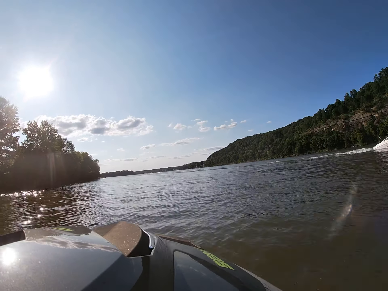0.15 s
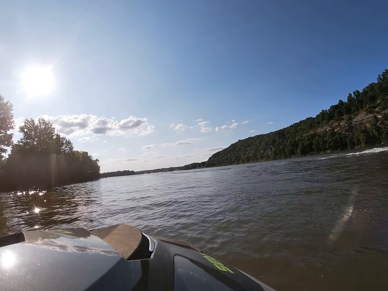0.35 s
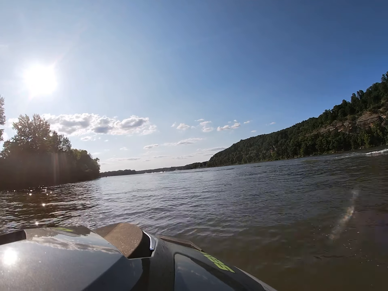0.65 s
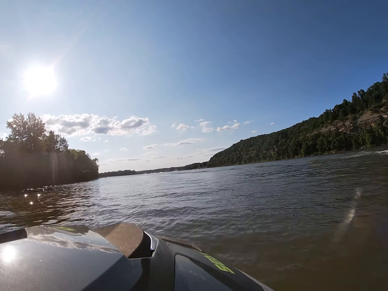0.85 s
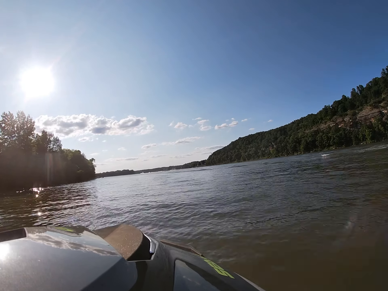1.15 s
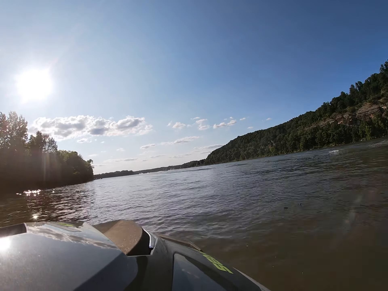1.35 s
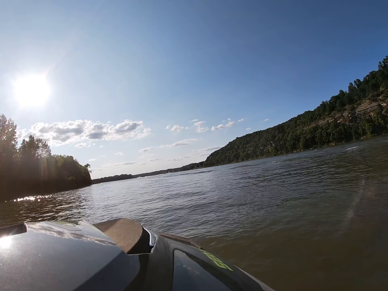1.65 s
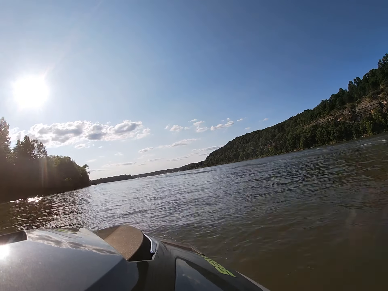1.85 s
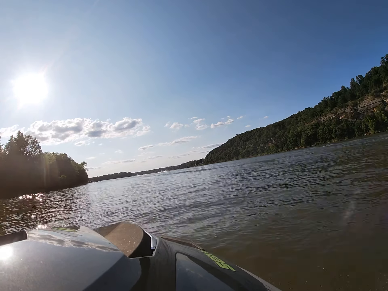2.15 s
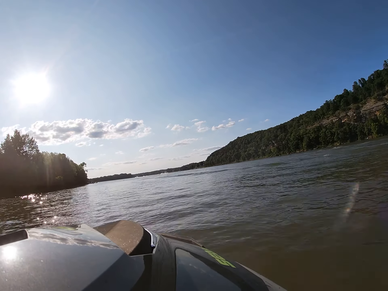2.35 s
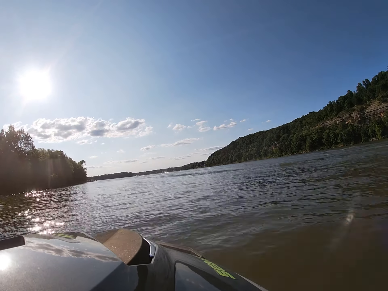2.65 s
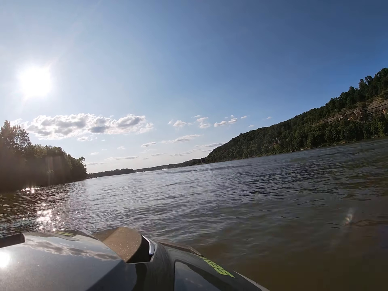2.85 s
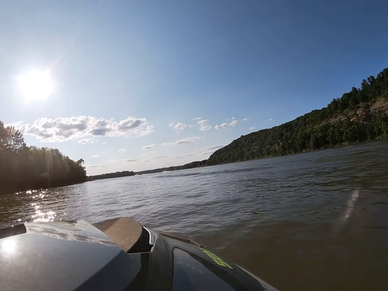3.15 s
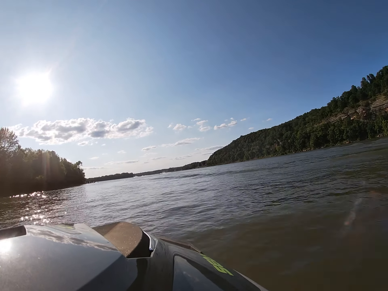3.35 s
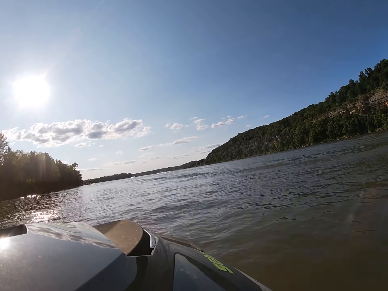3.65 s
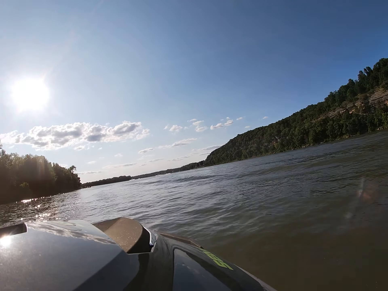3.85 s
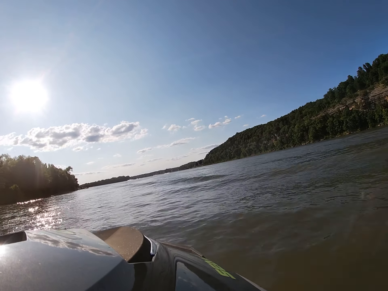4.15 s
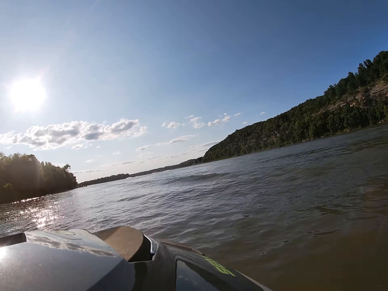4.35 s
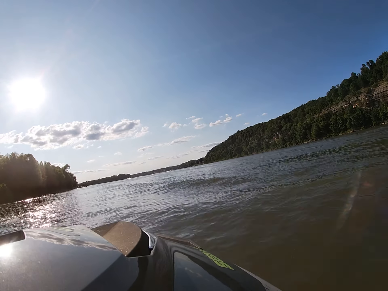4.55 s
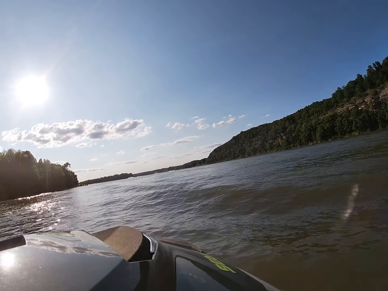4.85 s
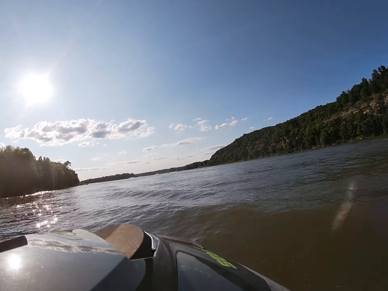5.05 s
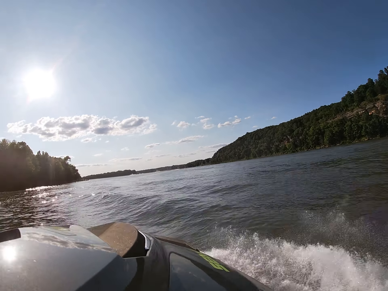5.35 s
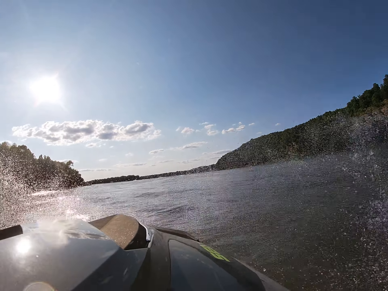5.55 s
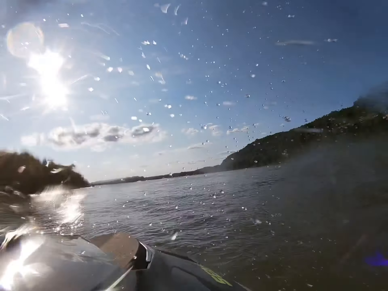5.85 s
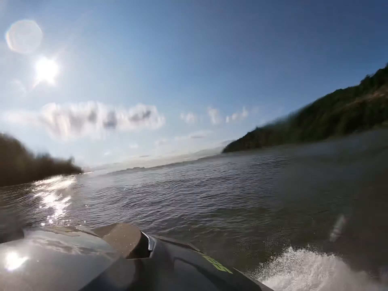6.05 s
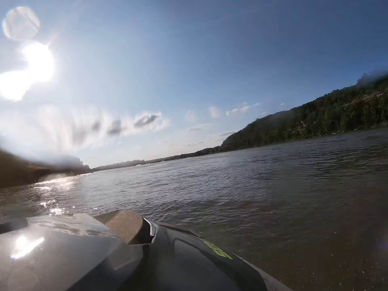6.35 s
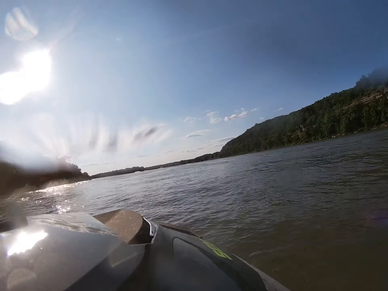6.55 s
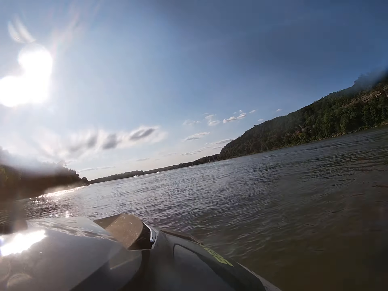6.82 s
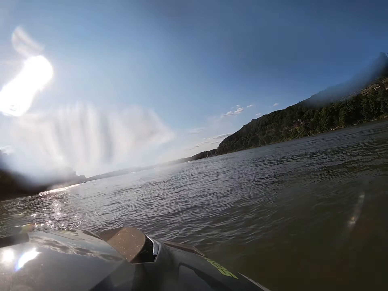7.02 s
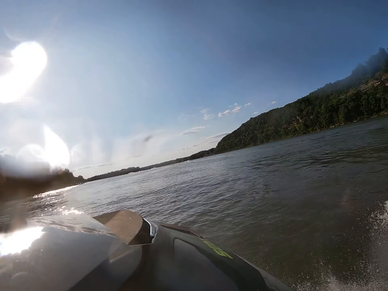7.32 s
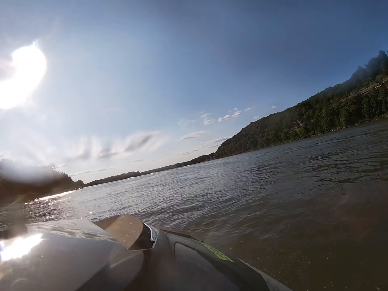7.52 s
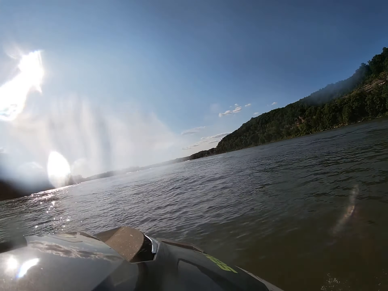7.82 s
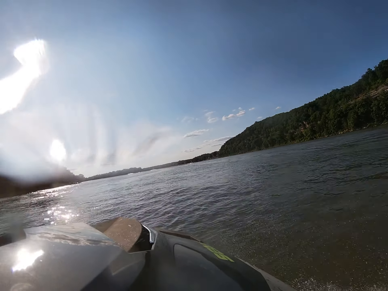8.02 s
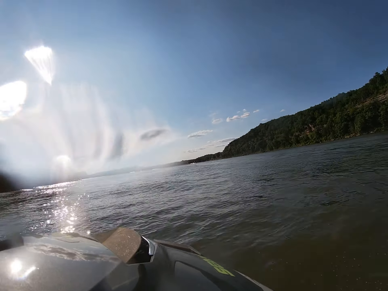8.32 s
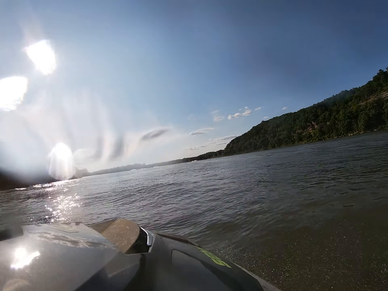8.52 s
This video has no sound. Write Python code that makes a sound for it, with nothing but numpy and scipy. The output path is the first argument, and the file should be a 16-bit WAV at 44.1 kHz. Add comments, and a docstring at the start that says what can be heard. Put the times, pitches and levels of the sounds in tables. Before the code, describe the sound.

Outdoors on open water, a hull-mounted microphone picks up a steady, fluttering engine drone under low wind buffeting and rushing water. Drops tap the housing and a loose part chirps faintly. Past midway the engine races upward and roughens as the craft hits a wake, with dense knocks, deep slaps and bright spray. The note collapses, rebounds, dips with another splash, then steadies among scattered drops.

```python
"""On a river, a three-cylinder jet craft cruises past waves and a wake, heard at its hull.
Shaft orders are summed as near-sines; the speed flares when the pump gulps air over the wake.
Wind and rushing water are coloured noise; drops, spits and swishes are brief bursts of filtered noise.
Gurgles, ticks and crackle are random decaying rings, and churned water excites the hull cavities.
Slams are windowed low sines; a loose part squeaks in rough pairs of tones."""
import sys
import numpy as np
from scipy import signal
from scipy.io import wavfile
from scipy.ndimage import uniform_filter1d

SR = 44100
rng = np.random.default_rng(int(sys.argv[2]) if len(sys.argv) > 2 else 0)


def linear_from_db(decibels):
    """Turn decibels (scalar or array-like) into linear amplitude factors; 0 gives 1."""
    return 10 ** (np.asarray(decibels, float) / 20)


def persist_wave(psi):
    """Save psi, clipped to +-1, as 16-bit WAV."""
    counts = np.round(np.clip(psi, -1, 1) * 32767).astype(np.int16)
    wavfile.write(sys.argv[1], SR, np.atleast_2d(counts).T)


N = 382788

# Shaft speed. Each row: time in seconds, speed in turns per second.
SHAFT_SPEED = [(0.03, 74.2), (0.39, 73.9), (0.7, 75.0), (1.16, 74.9), (1.47, 79.8), (2.0, 79.4),
               (2.32, 79.7), (3.45, 80.1), (3.64, 78.4), (4.07, 77.1), (4.56, 74.3), (4.8, 71.3),
               (4.97, 72.0), (5.11, 74.2), (5.28, 82.8), (5.34, 88.0), (5.41, 103.0), (5.47, 108.5),
               (5.53, 111.5), (5.59, 113.0), (5.63, 115.5), (5.76, 118.0), (5.87, 129.5), (5.96, 115.0),
               (6.07, 81.3), (6.24, 70.0), (6.39, 79.8), (6.53, 93.2), (6.66, 95.0), (6.77, 94.3),
               (6.92, 71.4), (7.05, 60.6), (7.26, 72.7), (7.36, 80.0), (7.5, 86.3), (7.88, 83.6),
               (8.1, 74.8), (8.34, 77.0), (8.68, 77.5)]
# Engine load; the last two columns sink when the pump gulps air.
# Each row: time in seconds, engine effort in dB, third order in dB, fourth order in dB.
ENGINE_LOAD = [(0.03, 1, 3, 7), (0.4, -1, 0.5, 3), (0.7, -1.5, 6, 7), (1.15, -3, 3.5, -2),
               (1.28, -5, 8.5, 3), (1.38, -2.5, 7, 6.5), (1.6, 1, 5.5, 7.5), (1.85, 0, 6.5, 5.5),
               (2.02, -5, 8.5, -1), (2.12, 4, 5, 6), (2.3, -7, 3, 10), (2.47, 3, 6.5, 6.5),
               (2.55, 5.5, 2, 1.5), (2.7, 5, 5.5, 0.5), (3.0, 4.5, 4.5, 5.5), (3.3, -4, 3, 8),
               (3.45, 4, 7, 4), (3.6, 4.5, 6, 6), (3.9, 1.5, 1, 5.5), (4.1, 2.5, 2, 3), (4.3, 4.5, 3.5, 6),
               (4.5, -4, 1.5, 4.5), (4.8, 2, 1.5, 7.5), (5.05, -5, 4.5, -2.5), (5.3, -1.5, 1, 2),
               (5.42, 1, -9, -15), (5.52, 2, -6, -2), (5.62, 6.5, -0.5, -13), (5.73, 10.5, -8, -6),
               (5.8, 0, -8, -10), (5.9, -5, -9, -14), (6.07, 3.5, 4, -14), (6.22, 6, -32, -29),
               (6.33, 4, -11, -9.5), (6.42, 4.5, -1.5, 3.5), (6.55, 0.5, -10, -19), (6.76, 2, 3.5, 0.5),
               (6.87, 4, 9.5, 6), (6.97, 4.5, -14, -19), (7.05, 7.5, -1.5, -11), (7.2, 6.5, -18.5, -18),
               (7.32, 12.5, 4.5, 5), (7.5, 2, -9, 6), (7.9, 5.5, 7.5, 5), (8.1, 5, -1, 8.5),
               (8.22, 2.5, 3, 5), (8.32, 5.5, 4, -15), (8.45, -11, 0.5, -10), (8.53, -2, 3.5, 6.5),
               (8.68, 0, 1, 5.5)]
# Second order. Each row: time in seconds, level change in dB.
SECOND_ORDER = [(0.03, 3), (1.2, 4), (1.6, 6), (2.7, -1), (4.0, -5.5), (5.1, 2), (5.35, 10.5), (5.45, 4.5),
                (5.52, 12), (5.6, -5), (5.78, 4), (5.9, -3), (6.2, -13), (6.45, 5), (6.7, -15), (6.95, 6),
                (7.2, -1), (7.5, 11.5), (8.0, -7), (8.68, 2.5)]
# Orders around the fifth; air in the pump breaks the lines up, shaking the phase of every order.
# Each row: time in seconds, level change in dB, rms of the fast phase shake in radians.
FIFTH_AND_ROUGHNESS = [(0.03, -2, .03), (1.2, -2, 0.024), (2.0, 4.5, 0.029), (2.7, 4, 0.034),
                       (3.3, 5.5, .05), (3.9, 7.5, 0.042), (4.5, 0.5, 0.13), (5.25, -2, 0.11),
                       (5.36, -6, .2), (5.43, 7.5, 0.17), (5.5, 8, .12), (5.6, 9, 0.13), (5.68, -7, .4),
                       (6.05, -17, 1), (6.3, -3, 0.43), (6.5, -12, 0.13), (6.9, -2, 0.088), (7.2, -6, 0.26),
                       (7.45, 3.5, 0.07), (8.0, 7, 0.054), (8.68, -3, 0.08)]
# Strong shaft orders, before load and hull. Each row: multiple of shaft speed, base rms in dB,
# rise in dB per 10 turns per second above 80.
STRONG_ORDERS = [(1, -29, 3), (1.5, -27, 0.5), (2, -33, 1), (3, -24, -1), (4, -24.5, 0.5), (5, -36, 2.5)]
# Weak orders from uneven firing. Each row: multiple of shaft speed, base rms in dB.
WEAK_ORDERS = [(2.5, -37), (3.5, -33), (4.5, -37), (5.5, -44), (6, -45), (7, -49.5), (7.5, -52), (8, -47.5),
               (9, -54)]
# Hull response to the strong orders. Each row: frequency in Hz, gain in dB.
HULL_RESPONSE = [(60, 3.5), (80, -3), (100, 0), (118, -3), (140, 5), (150, 11), (162, -3.5), (190, 6.5),
                 (222, 7), (240, 3), (258, -0.5), (283, 4), (298, -3), (318, 2), (345, 1.5), (372, -9),
                 (400, -0.5), (440, -2), (560, 0.5), (650, -23)]
# Panel resonances lifting the weak orders. Each row: centre in Hz, width in Hz, lift in dB.
PANEL_RESONANCES = [(578, 50, 10), (672, 30, 9), (420, 60, 2)]
# Slams of the hull on waves. Each row: start in seconds, peak in dB, pitch in Hz, length in seconds.
HULL_SLAMS = [(5.863, -12, 67, 0.049), (5.909, -7, 55.8, 0.08), (5.995, -14.5, 66.4, 0.11),
              (6.071, -16, 45.2, 0.067), (7.141, -21.5, 56.6, 0.18), (8.359, -16, 44.7, 0.058)]
# Churned water drumming in the hull over the wake. Each row: time in seconds, level in dB.
CHURN_LEVEL = [(5.27, -57.5), (5.33, -36), (5.42, -31), (5.5, -40), (5.6, -32), (5.68, -31.5), (5.78, -31),
               (5.9, -26), (6.02, -29.5), (6.09, -59)]
# Hull cavities rung by the churn. Each row: centre in Hz, width in Hz, relative level in dB.
HULL_CAVITIES = [(350, 90, -5), (552, 55, 1), (720, 110, -4), (1050, 130, -5), (1350, 200, -10)]
# Drops and slaps on the housing. Each row: start in seconds, tick peak in dB,
# bright edge relative to the tick in dB, body relative to the tick in dB.
HOUSING_DROPS = [(0.531, -33, -19, 11), (1.084, -34, -14, 14), (1.702, -35, -12, 13), (2.065, -40, -19, 11),
                 (2.154, -44, -16, 6), (2.198, -22, -20.5, 1), (2.392, -38, -12, 5), (2.603, -40, -20, 7),
                 (2.9294, -24, -18, 7), (3.458, -26.5, -15, 10), (3.765, -33, -18, 7),
                 (3.874, -31.5, -18, 18), (4.404, -21.5, -36, 8), (4.816, -33, -16, 13),
                 (5.3324, -24, -16, 7), (5.4527, -27, -18, 12), (5.4776, -30, -16, 6),
                 (5.5454, -36, -18, 15), (5.65, -31, -22, 17), (5.6744, -25, -20, 11), (5.72, -41, -17, 16),
                 (5.739, -25.5, -25, -2), (5.763, -24, -9, 17), (5.7896, -35, -22, -1),
                 (5.8105, -16.5, -11, 12), (5.8343, -33, 0, 15), (5.8438, -33, -3, 26),
                 (5.8511, -15.5, -14, 8), (5.876, -13, -23, 3), (5.894, -23, -22, 1), (5.915, -24, -5, 2),
                 (5.924, -17, -14, 4), (5.957, -14, -12, 11), (5.9964, -34, -18, 4),
                 (6.0029, -20, -20, 12.5), (6.016, -23, -7, 10), (6.024, -24.5, -4, 19),
                 (6.045, -18, -31, -6), (6.0827, -17, -31, 7.5), (6.167, -32.5, -20, 15),
                 (6.255, -40, -14, 11), (7.119, -31, -30, 7), (7.1613, -33, -14, 10),
                 (7.1755, -36, -15, 12), (7.192, -35, -10, 4), (7.2215, -16, -25, -3),
                 (7.225, -22.5, -15, 13), (7.265, -38, -11.5, 8), (7.316, -23, -22, 4),
                 (7.502, -34.5, -17, 17), (7.8607, -26, -21, 11), (7.904, -27, -19, 12),
                 (8.0674, -23, -16, -3.5), (8.08, -32, -27, 15), (8.092, -32, -25, 8),
                 (8.1265, -21, -29, 11), (8.2365, -30, -27, 20.5), (8.2558, -19, -23, 0),
                 (8.2958, -35, -28, 10), (8.305, -29, -22, 17), (8.3388, -21, -32, -3),
                 (8.3473, -26, -27, 8), (8.3845, -22, -22, 2), (8.401, -29, -22, 18),
                 (8.409, -17.5, -26, 5), (8.4458, -25.5, -25, 9), (8.4782, -28, -19, 10),
                 (8.557, -22, -24, 6), (8.57, -28, -16, 6.5)]
# Fine spray spitting on the microphone port. Each row: start in seconds, peak in dB, pitch in Hz.
PORT_SPITS = [(5.642, -55, 9600), (5.66, -46, 5000), (5.664, -45, 9000), (5.687, -49, 9500),
              (5.696, -51, 9000), (5.716, -56, 8500), (5.7374, -39.5, 9300), (5.742, -38, 5600),
              (5.749, -55, 8800), (5.763, -39, 5200), (5.784, -49, 7000), (5.789, -40, 5000),
              (5.815, -37, 5230), (5.827, -41, 8500), (5.8338, -38, 5600), (5.8447, -34, 8300),
              (5.851, -40, 5600), (5.864, -44, 4470), (5.872, -46, 6000), (5.8974, -32, 4500),
              (5.915, -34.5, 8600), (5.925, -43.5, 6500), (5.936, -49, 8500), (5.944, -53, 7500),
              (5.958, -28.5, 4500), (5.969, -40, 4300), (5.9945, -41, 4700), (6.014, -51, 6500),
              (6.0245, -35, 5000), (6.0238, -42, 8540)]
# Sheets of water off the bow. Each row: start in seconds, rms before the envelope in dB,
# decay length in seconds.
BOW_SWISHES = [(2.698, -46, 0.028), (2.768, -50, 0.055), (2.998, -44.5, 0.034), (3.561, -50, 0.039),
               (3.685, -46.5, 0.043), (3.756, -42.5, 0.032), (3.87, -54, 0.0099), (4.285, -41, 0.041),
               (4.355, -43.5, 0.019), (4.433, -42.5, 0.058), (4.473, -44, 0.049), (4.529, -47, 0.027),
               (5.345, -46, 0.045), (5.383, -40, 0.076), (5.554, -43, 0.041), (5.799, -50, 0.05),
               (5.874, -47, .06), (7.157, -45.5, 0.053), (7.206, -46, 0.081), (8.38, -57, 0.035),
               (8.432, -58, 0.049)]
# Rush under the hull, before surges. Each row: time in seconds, level in dB.
RUSH_LEVEL = [(0.03, -31.5), (0.3, -28.5), (1.25, -29), (1.75, -31.5), (2.1, -29.5), (2.24, -22.5),
              (2.35, -24.5), (2.9, -25.5), (3.3, -28.5), (3.75, -24), (4.1, -25), (4.55, -24.5), (4.6, -23),
              (4.63, -20), (4.665, -20.5), (4.685, -30.5), (4.8, -28.5), (5.25, -28), (5.33, -23.5),
              (5.41, -21), (5.5, -20.5), (5.6, -20.5), (5.74, -20), (5.85, -23.5), (5.95, -15.5),
              (5.985, -25.5), (6.03, -15.5), (6.07, -30.5), (6.14, -38), (6.5, -29), (6.82, -26),
              (7.11, -30), (7.17, -20.5), (7.205, -22.5), (7.235, -21.5), (7.28, -24.5), (7.4, -28),
              (7.85, -25.5), (8.02, -28.5), (8.08, -20), (8.2, -28), (8.42, -23.5), (8.65, -27)]
# Hiss of broken water, before surges. Each row: time in seconds, level in dB.
HISS_LEVEL = [(0.03, -43.5), (0.22, -44.5), (1.04, -44.5), (1.09, -43), (1.69, -46.5), (2.16, -42),
              (3.1, -42), (3.3, -44.5), (3.75, -42), (4.13, -41), (4.66, -40), (4.73, -43.5), (4.9, -42),
              (5.26, -44), (5.41, -41), (5.53, -41.5), (5.57, -39), (5.96, -37.5), (5.98, -46), (6.01, -32),
              (6.03, -40.5), (6.13, -48.5), (7.18, -43), (7.23, -41), (7.26, -42), (7.69, -44.5),
              (7.81, -41), (8.36, -44.5), (8.41, -39), (8.43, -42), (8.46, -35), (8.53, -43.5), (8.58, -38),
              (8.65, -40.5)]
# Fine spray, before surges. Each row: time in seconds, level in dB.
SPRAY_LEVEL = [(0.03, -64), (0.45, -63.5), (0.85, -66), (1.2, -63), (1.66, -67.5), (2.15, -63),
               (2.7, -71.5), (3.2, -71.5), (3.6, -66), (3.9, -70), (4.9, -68.5), (5.2, -72), (5.38, -62),
               (5.6, -68), (5.75, -57), (5.86, -60.5), (6.15, -76), (6.5, -77), (6.82, -67.5), (7.2, -63.5),
               (7.4, -70.5), (7.85, -64), (8.25, -71), (8.65, -73)]
# Spectrum of the rush. Each row: frequency in Hz, relative density in dB per Hz.
RUSH_COLOUR = [(100, -17), (200, 10), (350, 0.5), (550, 0), (750, -7.5), (1100, -11), (1600, -18.5),
               (2200, -40.5), (4000, -49)]
# Spectrum of the splash. Each row: frequency in Hz, relative density in dB per Hz.
SPLASH_COLOUR = [(700, -14), (1400, 5.5), (2200, -0.5), (3200, -3.5), (4200, -11), (5600, -14.5),
                 (6600, -37), (8000, -39)]
# Spectrum of the spray. Each row: frequency in Hz, relative density in dB per Hz.
SPRAY_COLOUR = [(5000, -17.5), (6300, 0.5), (7500, -3), (8600, -1), (9800, 1), (10600, -4.5),
                (11500, -13.5), (12500, -12), (14300, -37.5), (15000, -57)]
# Chirps of a loose part. Each row: start in seconds, upper tone level in dB, mean pitch in Hz,
# lower partner relative to the upper tone in dB.
LOOSE_PART_SQUEAKS = [(0.3052, -50, 3020, 15), (0.372, -47, 3000, -3), (0.574, -41, 2940, -2),
                      (0.6, -46.5, 2900, 10.5), (0.946, -46, 2820, 5), (1.037, -43, 2770, 1),
                      (1.0848, -44, 2830, 6), (1.139, -41, 2980, 2.5), (1.466, -45, 3015, 5),
                      (1.993, -46, 3240, 4), (2.446, -42, 3080, -1), (2.546, -46, 2860, -6),
                      (3.18, -40.5, 3050, -5.5), (3.482, -39.5, 3200, 1), (4.1038, -43, 3520, -17),
                      (4.565, -46, 3370, -6.5), (4.601, -47, 3200, 7), (4.634, -52, 3200, 1),
                      (4.655, -48, 3620, -8), (4.6903, -40, 3280, -2.5), (4.708, -50, 3250, -7),
                      (4.742, -44.5, 3180, -8), (4.772, -47, 3300, -11), (4.813, -39, 3500, -2),
                      (4.836, -49, 3480, -6), (4.883, -47, 3270, 8), (4.902, -54, 3250, 19),
                      (4.972, -51, 3170, 10), (5.6208, -35.5, 3620, -9)]
# Wind buffeting, before gusts. Each row: time in seconds, level in dB.
WIND_LEVEL = [(0.03, -17.5), (1.0, -22), (1.5, -17.5), (2.8, -18), (3.9, -17), (4.8, -20.5), (5.3, -18.5),
              (5.37, -17), (5.5, -18), (5.7, -13), (6.0, -20.5), (6.45, -21), (6.9, -18.5), (7.15, -16),
              (7.24, -13.5), (7.4, -19), (8.0, -18), (8.65, -17.5)]
# Spectrum of the wind. Each row: frequency in Hz, relative density in dB per Hz.
WIND_COLOUR = [(15, -11.5), (30, 7), (60, 3.5), (120, -1), (200, 2.5), (320, -1), (450, -16), (800, -46.5)]

FLUTTER_DB = 1.8  # rms wavering of the orders that follow engine effort
FAINT_FADE_DB = 5.5  # lost by the weak orders per 10 turns per second above 90
KNOCKS_PER_S, KNOCK_SPREAD_DB, KNOCK_TOP_HZ = 400, 4, 1800
DROP_T60_S = 0.02  # 60 dB decay time of the tick
SPIT_DECAY_S, SPIT_SPAN = 0.0009, 1.35  # span: pitch ratio covered on either side
SURGE_DB = 0.6
SURGE_GROWTH = 0.076  # surge dB per dB of rush above -30.5: heavy water comes in lumps
SQUEAK_S = 0.025
GUST_DB = 1.5


def evened(x):
    """Normalization: the mean power is brought to unity."""
    return x / np.sqrt(np.mean(x ** 2) + 1e-20)


def column(rows, index):
    """Linear interpolation: one table column is evaluated at every sample."""
    table = np.array(rows)
    return np.interp(np.arange(N) / SR, table[:, 0], table[:, index])


def wander(hz):
    """Random modulation: interpolated noise of unit rms drifts at rates up to about hz."""
    steps = rng.standard_normal(4000)
    return evened(np.interp(np.arange(N) / SR * 2 * hz, np.arange(len(steps)), steps))


def add(mix, s, sound):
    """Superposition: a sound is summed into the mix from time s in seconds."""
    part = mix[round(s * SR):][:len(sound)]
    part += sound[:len(part)]


def bandpass(order, low_hz, high_hz):
    """Band limitation: a Butterworth filter passes one range of frequencies."""
    return signal.butter(order, (low_hz, high_hz), "bandpass", fs=SR, output="sos")


def drop_sizes(per_s, spread_db):
    """Random arrivals: sparse impulses carry capped, exponentially distributed dB levels."""
    size = linear_from_db(spread_db * np.minimum(rng.exponential(1, N), 4))
    return size * (rng.random(N) < per_s / SR)


def turbulence(colour, size, patchy_db, flicker_db):
    """Turbulent noise: a shaped spectrum drifts in patches and flickers at all pitches together."""
    hop = size // 4
    frames = N // hop + 5
    hz = np.fft.rfftfreq(size, 1 / SR)
    real, imaginary, patches = rng.standard_normal((frames, len(hz), 3)).T
    patches = uniform_filter1d(patches, size=8, axis=0)
    patches = evened(uniform_filter1d(patches, size=8, axis=1))
    flicker = evened(uniform_filter1d(rng.standard_normal(frames), size=4))
    colour_hz, colour_db = np.transpose(colour)
    shape_db = np.interp(np.log(hz + 1), np.log(colour_hz), colour_db, left=-90, right=-90)
    level_db = shape_db[:, None] + patchy_db * patches + flicker_db * flicker
    spectrum = (real + 1j * imaginary) * linear_from_db(level_db)
    return evened(signal.istft(spectrum, nperseg=size, noverlap=size - hop)[1][:N])


def patter(low_hz, high_hz, cycles, per_s, spread_db):
    """Damped oscillation: random drops of many sizes each ring for a few cycles at one pitch."""
    size = drop_sizes(per_s, spread_db)
    pitches = np.geomspace(low_hz, high_hz, num=12)
    kind = rng.integers(0, len(pitches), size=N)
    t, out = np.arange(1200) / SR, np.zeros(N)
    for k, hz in enumerate(pitches):
        ring = np.sin(2 * np.pi * hz * t) * (hz * t) ** 2 * np.exp(-5 * hz * t / cycles)
        out += signal.oaconvolve(size * (kind == k), ring)[:N]
    return evened(out)


def strong_order_levels(shaft_hz, fifth_db):
    """Forced response: load and speed set each strong order, and the hull transmits it."""
    effort_db, third_db, fourth_db = (column(ENGINE_LOAD, index=i) for i in (1, 2, 3))
    own_drive = {2: column(SECOND_ORDER, index=1), 3: third_db, 4: fourth_db, 5: fifth_db}
    hull_hz, hull_db = np.transpose(HULL_RESPONSE)
    over = np.minimum(shaft_hz - 80, 15) / 10
    levels = []
    for k, db, rise_db in STRONG_ORDERS:
        drive_db = own_drive[k] if k in own_drive else effort_db + FLUTTER_DB * wander(hz=5)
        carried_db = np.interp(k * shaft_hz, hull_hz, hull_db)
        levels.append((k, db + drive_db + rise_db * over + carried_db))
    return levels


def weak_order_levels(shaft_hz, fifth_db):
    """Resonance: weak orders come and go, and swell as they pass through the panel modes."""
    third_db = column(ENGINE_LOAD, index=2)
    fade_db = FAINT_FADE_DB * np.maximum(shaft_hz - 90, 0) / 10
    levels = []
    for k, db in WEAK_ORDERS:
        lift_db = sum(top_db / (1 + (2 * (k * shaft_hz - hz) / width) ** 2)
                      for hz, width, top_db in PANEL_RESONANCES)
        drive_db = fifth_db if 4 < k < 6 else 0.26 * third_db
        levels.append((k, db + drive_db - fade_db + lift_db + 2.5 * wander(hz=6)))
    return levels


def engine():
    """Order synthesis: near-sines flutter as the hull panels load and unload on the water."""
    shaft_hz = column(SHAFT_SPEED, index=1)
    angle = 2 * np.pi * np.cumsum(shaft_hz * (1 + 0.002 * wander(hz=10))) / SR
    fifth_db, rough = (column(FIFTH_AND_ROUGHNESS, index=i) for i in (1, 2))
    levels = strong_order_levels(shaft_hz, fifth_db) + weak_order_levels(shaft_hz, fifth_db)
    out = np.zeros(N)
    for k, db in levels:
        # each order wobbles separately in phase and level
        slip = 2 * np.pi * rng.random() + 0.25 * wander(hz=10) + rough * wander(hz=35)
        out += linear_from_db(db + 1.4 * wander(hz=14)) * np.sqrt(2) * np.cos(k * angle + slip)
    return out


def slams():
    """Impact: the hull meets a wave and gives a few cycles of deep, rounded thud."""
    out = np.zeros(N)
    for s, db, hz, length in HULL_SLAMS:
        t = np.arange(int(length * SR)) / SR
        add(out, s, linear_from_db(db) * np.hanning(len(t)) * np.sin(2 * np.pi * hz * t))
    return out


def churn():
    """Cavity resonance: dense, uneven, soft-edged knocks of water ring the hull cavities."""
    knocks = drop_sizes(KNOCKS_PER_S, KNOCK_SPREAD_DB) * rng.choice([-1., 1.], N)
    knocks = signal.sosfilt(signal.butter(4, KNOCK_TOP_HZ, fs=SR, output="sos"), knocks)
    rung = np.zeros(N)
    for hz, width, db in HULL_CAVITIES:
        b, a = signal.iirpeak(hz, hz / width, fs=SR)
        rung += linear_from_db(db) * evened(signal.lfilter(b, a, knocks))
    return linear_from_db(column(CHURN_LEVEL, index=1)) * evened(rung)


def drops():
    """Impulse: a drop punches the microphone port inward, leaving a tick and shorter bright edge."""
    t, out = np.arange(3000) / SR, np.zeros(N)
    body, tick, edge = bandpass(3, 350, 1200), bandpass(3, 900, 2200), bandpass(5, 2600, 6000)
    punch = -np.pad(np.blackman(44), (0, len(t) - 44))  # a 1 ms inward push
    noises = rng.standard_normal((len(HOUSING_DROPS), 3, len(t)))
    for (s, db, treble_db, body_db), noise in zip(HOUSING_DROPS, noises):
        # filter, share of the punch, relative level in dB, decay relative to the tick
        parts = [(body, 3, body_db, 1.4), (tick, 1.5, 0, 1), (edge, 0, treble_db, 0.7)]
        for (band, push, rel_db, lasts), puff in zip(parts, noise):
            decay = linear_from_db(-60 * t / (lasts * DROP_T60_S))
            burst = signal.sosfilt(band, push * punch + puff * decay)
            add(out, s, linear_from_db(db + rel_db) * burst / abs(burst).max())
    return out


def spits():
    """Transient excitation: a decaying snap of noise fills a wide band around each spit's pitch."""
    t, out = np.arange(300) / SR, np.zeros(N)
    for (s, db, hz), noise in zip(PORT_SPITS, rng.standard_normal((len(PORT_SPITS), len(t)))):
        band = bandpass(3, hz / SPIT_SPAN, min(hz * SPIT_SPAN, 10600))
        tick = signal.sosfilt(band, noise * np.exp(-t / SPIT_DECAY_S))
        add(out, s, linear_from_db(db) * tick / abs(tick).max())
    return out


def swishes():
    """Noise burst: a sheet of water off the bow starts fast, bright, and thins out."""
    band, out = bandpass(7, 2000, 5800), np.zeros(N)
    for (s, db, length), noise in zip(BOW_SWISHES, rng.standard_normal((len(BOW_SWISHES), 6000))):
        u = np.arange(len(noise)) / SR / length
        tilted = signal.lfilter([1], [1, -0.8], noise)  # less treble
        bright = evened(signal.sosfilt(band, tilted))
        add(out, s, linear_from_db(db) * bright * np.minimum(8 * u, 1) * np.exp(-u ** 2))
    return out


def flow():
    """Common modulation: the dB levels of rush, hiss and spray surge together."""
    rush_db = column(RUSH_LEVEL, index=1)
    lumps_db = SURGE_GROWTH * np.maximum(rush_db + 30.5, 0) * wander(hz=30.5)
    surge_db = SURGE_DB * wander(hz=9) + lumps_db
    return [db + surge_db for db in (rush_db, column(HISS_LEVEL, index=1), column(SPRAY_LEVEL, index=1))]


def droplets(levels):
    """Nonlinear growth: gurgles outgrow the rush, ticks follow the hiss, crackle the spray."""
    rush_db, hiss_db, spray_db = levels
    gurgle = patter(400, 1300, cycles=2.8, per_s=200, spread_db=4.0)
    ticks = patter(1400, 4200, cycles=12.0, per_s=390, spread_db=6.3)
    crackle = patter(5500, 10500, cycles=4, per_s=400, spread_db=4.5)
    low = linear_from_db(1.27 * rush_db - 6.0) * gurgle
    return low + linear_from_db(1.463 * hiss_db + 5.0) * ticks + linear_from_db(1.6 * spray_db + 27) * crackle


def rushing_water(levels):
    """Flow noise: rush, splash and spray are turbulent layers, each brighter than the last."""
    rush = turbulence(RUSH_COLOUR, size=512, patchy_db=-1.0, flicker_db=-0.64)
    splash = turbulence(SPLASH_COLOUR, size=256, patchy_db=0.3, flicker_db=1.0)
    spray = turbulence(SPRAY_COLOUR, size=256, patchy_db=1.2, flicker_db=0.5)
    return sum(linear_from_db(db) * layer for db, layer in zip(levels, [rush, splash, spray]))


def squeaks():
    """Frequency jitter: a loose part chirps roughly, with a partner at about half the pitch."""
    n, out = int(SQUEAK_S * SR), np.zeros(N)
    jitters = rng.standard_normal((len(LOOSE_PART_SQUEAKS), 3000))
    for (s, db, hz, partner_db), jitter in zip(LOOSE_PART_SQUEAKS, jitters):
        rough = 0.25 * uniform_filter1d(jitter, size=60)[:n]
        angle = 2 * np.pi * np.cumsum(hz * (1 + rough)) / SR
        chirp = np.sin(angle) + linear_from_db(partner_db) * np.sin(0.53 * angle)
        add(out, s, linear_from_db(db) * signal.windows.tukey(n, 0.7) * chirp)
    return out


def wind():
    """Wind buffeting: lumpy low-frequency turbulence thumps the microphone in gusts."""
    buffet = turbulence(WIND_COLOUR, size=2048, patchy_db=-2.5, flicker_db=-1.0)
    return linear_from_db(column(WIND_LEVEL, index=1) + GUST_DB * wander(hz=8)) * buffet


def scene():
    """Superposition: all sources sum at one microphone."""
    levels = flow()
    impacts = slams() + churn() + drops() + spits() + swishes()
    water = impacts + droplets(levels) + rushing_water(levels)
    return (engine() + water + squeaks() + wind())[None]


def roll_off(x):
    """The treble ends steeply here."""
    return signal.sosfilt(signal.butter(12, 14400, fs=SR, output="sos"), x)


def record(dry):
    """Saturation: the small microphone rounds off the tallest peaks."""
    ceiling = 0.94
    ends = signal.windows.tukey(N, 200 / N)  # a 2 ms fade at either end
    finished = ends * ceiling * np.tanh(dry / ceiling)
    return roll_off(finished)


dry = scene()
out = record(dry)
persist_wave(out)
```